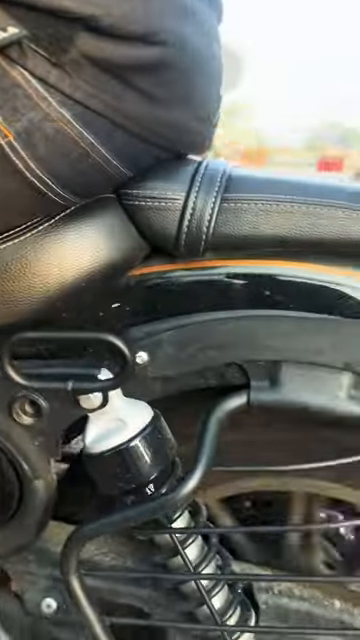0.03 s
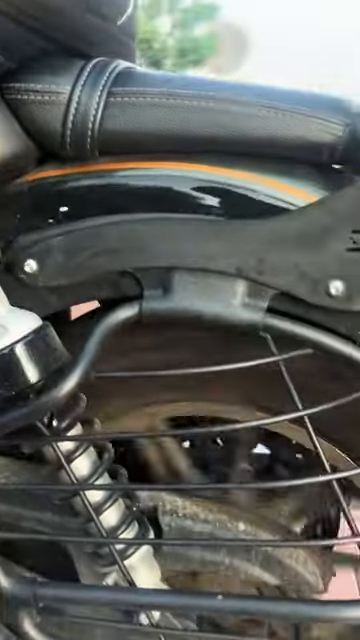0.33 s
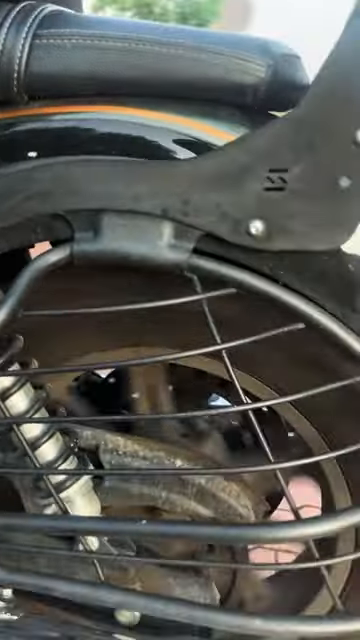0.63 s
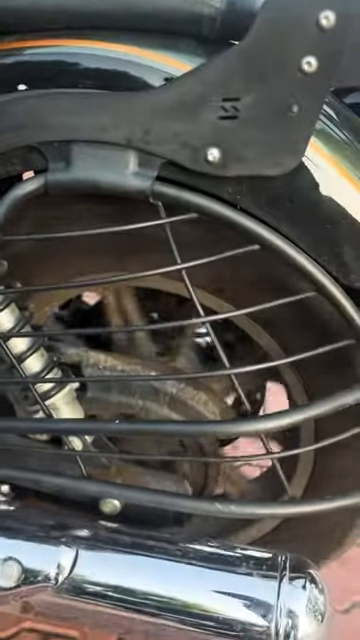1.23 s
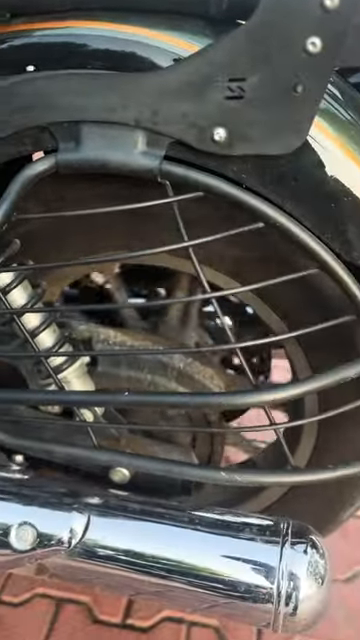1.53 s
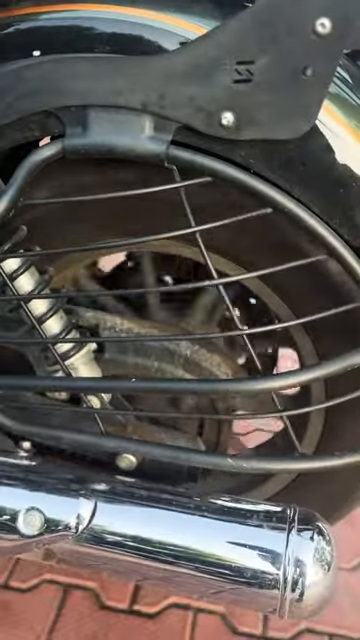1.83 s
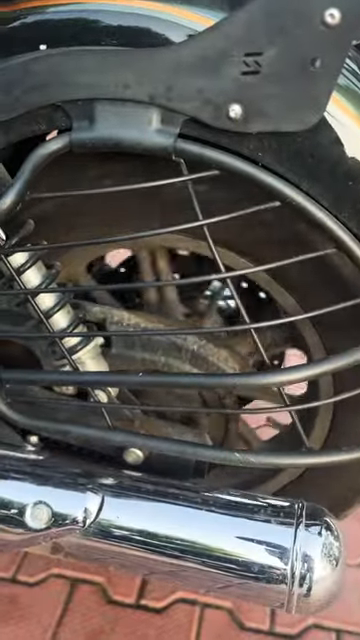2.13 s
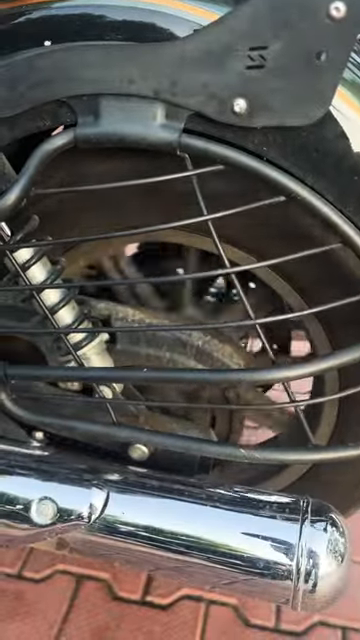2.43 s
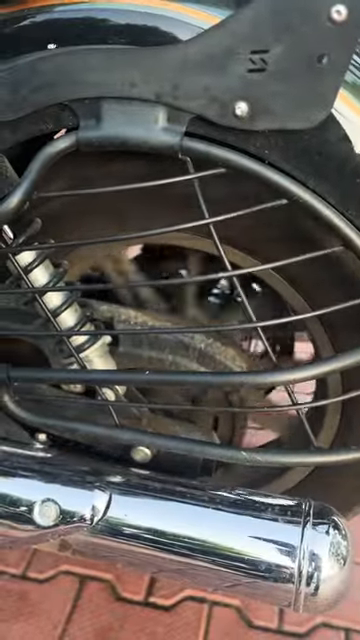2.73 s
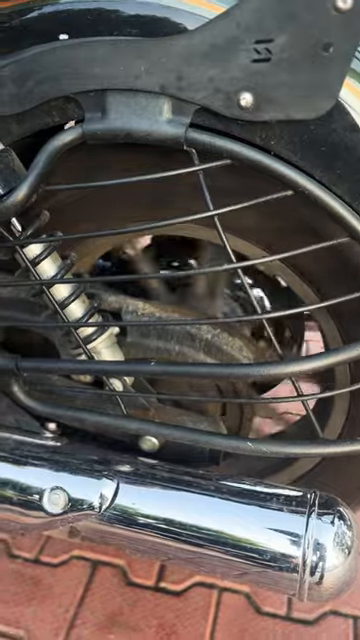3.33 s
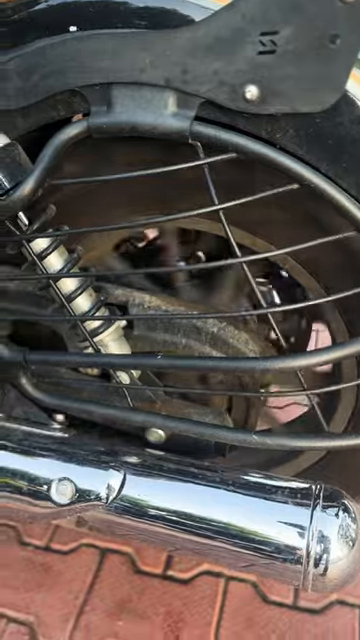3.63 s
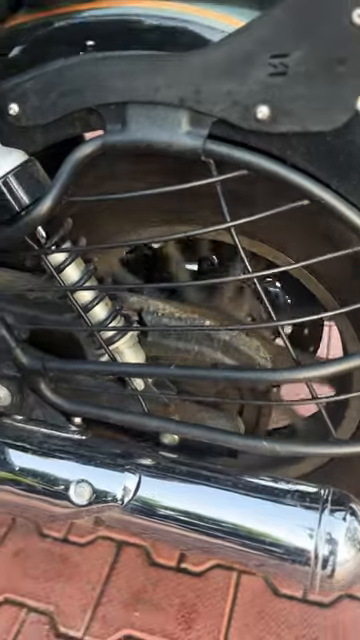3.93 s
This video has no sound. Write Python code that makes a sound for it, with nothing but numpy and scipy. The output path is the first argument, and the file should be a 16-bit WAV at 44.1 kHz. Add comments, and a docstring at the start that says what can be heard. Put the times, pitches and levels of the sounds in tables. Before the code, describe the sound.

Outdoors and very close, a twin-cylinder motorcycle engine rises with a raspy growl, slows to an uneven low thump, then is revved a second time. Faint hiss and metal knocks come as it slows.

```python
"""A parked twin-cylinder motorcycle, close by, revs twice and sinks to a loping idle in between.
Unevenly spaced exhaust pulses ring the silencer: bright under throttle, a hollow boom on the overrun.
Gas rasps and growls in the pipe; single firings pop. Hiss and valve ticks grow with speed.
Drive slack knocks on the case, metal clicks, and the gears whine briefly as the engine slows."""
import sys
import numpy as np
from scipy import signal
from scipy.fft import rfft, irfft
from scipy.io import wavfile

SR = 44100
rng = np.random.default_rng(int(sys.argv[2]) if len(sys.argv) > 2 else 0)


def int16_out(signal):
    """Quantize to a 16-bit WAV file."""
    q = np.round(np.clip(np.atleast_2d(signal).T, -1, 1) * 32767)
    wavfile.write(sys.argv[1], SR, q.astype(np.int16))


N = 176400
TIME_S = np.arange(N) / SR

# engine speed: t/s, four-stroke cycle rate/Hz
ENGINE_SPEED = [(0.0, 23.474), (0.2, 29.617), (0.4, 35.753), (0.55, 37.722), (0.66, 37.291), (0.8, 33.76),
                (1.0, 27.847), (1.25, 21.103), (1.4, 17.556), (1.55, 15.536), (1.7, 11.495), (1.85, 11.047),
                (2.3, 11.168), (2.43, 12.204), (2.58, 17.645), (2.75, 24.056), (3.0, 30.806), (3.15, 34.65),
                (3.28, 36.368), (3.38, 36.376), (3.5, 32.876), (3.75, 26.2), (4.0, 19.776)]
# throttle: t/s, opening/0-1
THROTTLE_OPENING = [(.65, 0.74), (.67, 0), (2.43, 0.17), (2.445, 0.96), (3.36, 0.87), (3.38, 0.12)]
# metal clicks: t/s, f/Hz, level/dB
METAL_CLICKS = [(.743, 12200, -17), (1.41, 7900, -21.5), (3.489, 7950, -18)]
# gear whines: t/s, f/Hz, level/dB
GEAR_WHINES = [(0.781, 2700, -26.5), (.98, 2180, -21.5), (1.141, 1830, -30), (1.32, 1570, -26),
               (1.391, 1470, -33), (3.5, 2570, -19.5), (3.725, 2140, -22), (3.895, 1746, -27.5)]
# cooling fin modes: f/Hz, width/Hz, level/dB
FIN_MODES = [(2174, 31, 6), (2530, 27, 2.5), (2758, 31, 0), (2900, 22, 3.5), (3425, 22, -1),
             (3610, 20, 1.5), (4010, 22, -4), (4270, 30, 1.5), (4810, 19, 0), (5100, 95, 0), (6830, 25, -2)]
# drive knocks: t/s, level/dB
DRIVE_KNOCKS = [(0.788, -7), (.803, 1.5), (1.11, -13), (1.196, -0.5), (1.288, -4), (1.396, -1), (2.578, 4),
                (3.455, 2), (3.626, -2), (3.684, 3), (3.798, -1.5)]
# engine case modes: f/Hz, T60/s, level/dB
CASE_MODES = [(1310, 0.054, -0.5), (1418, 0.037, -0.5), (1454, 0.043, 2), (1510, 0.064, 0.5),
              (1850, 0.016, -9.5), (2040, 0.04, -7), (2584, 0.068, -4.5), (2756, 0.025, -10),
              (4140, 0.022, -15)]
# chain and valve gear hiss, with audio compression gaps at 6200 and 9800 Hz: f/Hz, level/dB
GAPPED_HISS_SPECTRUM = [(150, 5.5), (400, 2), (850, -4.5), (1150, -2), (1450, 3.5), (1750, -2.5),
                        (2300, -5.5), (2700, -5.5), (3300, -7.5), (4050, -4.5), (4600, -9.5), (5200, -8.5),
                        (6200, -24), (8200, -9.5), (9800, -28), (13000, -14.5), (15000, -55)]
# growl partials: multiple of the cycle rate, level/dB
ENGINE_ORDERS = [(10, -14), (11, -1.5), (12, -9), (13, -6), (14, 1.5), (15, -7)]
# pipe and case resonances in the gas rush: f/Hz, width/Hz, level/dB
RASP_MODES = [(295, 18, -25), (421, 55, -6.5), (481, 72, -8.5), (749.7, 12.4, 4.5)]
# sharp firings: t/s, thump/dB, crack/dB
SHARP_FIRINGS = [(1.335, 4.5, -15.5), (1.357, 4.5, -22), (2.445, -6, -15), (2.518, -17, -12),
                 (2.579, -15, -14), (2.632, -14, -15)]
# weak strokes on the overrun: t/s, length/s, level/dB
WEAK_STROKES = [(0.76, 0.019, -22), (1.325, .05, -6.5)]
# throttle, overrun, idle: level/dB, other cylinder's gain, speed exponent, scatter/dB, cut-off/Hz
EXHAUST_STATES = [(3, 0.95, 0.62, .5, 510), (4, 0.59, 0.12, 2.8, 250), (2.5, 0.68, .01, 2.5, 233)]
# silencer modes: f/Hz, width/Hz, signed gains for throttle, overrun, idle
SILENCER_MODES = [(59.7, 30.3, -1.44, -1, 0), (84.8, 21, 2.04, 4, 2.5), (108, 19.7, -0.25, -4.5, -2),
                  (137.7, 44, -1.34, 1.47, 0.25), (184.7, 48.6, 0.32, 0.27, 0.84),
                  (243, 57, 0.66, 0.55, 0.05)]
# lead of the left microphone port: f/Hz, phase/rad
PORT_LEAD = [(60, 0), (250, 0.36), (600, 0.65), (1300, 0.06), (2500, 1.7), (4500, 1.95), (8000, 1.22),
             (13000, 1.35)]
# noise correlation between ports: f/Hz, correlation/0-1
PORT_CORRELATION = [(200, 0.97), (600, 0.79), (1400, 0.73), (2500, 1), (5000, 0.6), (10000, 0.86)]

MID_SPEED_HZ = 24.48
START_CYCLES, SECOND_FIRING_CYCLES = .43, .4
TICK_DECAY_S = .0027


def undb(db):
    """Decibels to gain."""
    return 10 ** (np.asarray(db) / 20)


def unit(x):
    """Scale to rms 1."""
    return x / np.sqrt(np.mean(x ** 2))


def curve(rows):
    """Linear interpolation of (t/s, value) rows."""
    return np.interp(TIME_S, *np.array(rows).T)


def across(rows):
    """(f/Hz, value) rows onto FFT bins, interpolated in log f."""
    hz, value = np.array(rows).T
    return np.interp(np.log(np.arange(N // 2 + 1) * SR / N + 1), np.log(hz), value)


def band(x, hz, width_hz):
    """Resonator, unity peak gain."""
    return signal.lfilter(*signal.iirpeak(hz, hz / width_hz, fs=SR), x)


def low(x, hz, order=2):
    """Butterworth low-pass."""
    return signal.sosfilt(signal.butter(order, hz, fs=SR, output="sos"), x)


def pulses(times_s, sizes):
    """One impulse per time."""
    inside = (times_s >= 0) & (times_s < (N - 1) / SR)
    return np.bincount(np.round(times_s[inside] * SR).astype(int), sizes[inside], N)


def fade(x, decay_s):
    """Exponential tail on each impulse."""
    return signal.lfilter([1], [1, -np.exp(-1 / (decay_s * SR))], x + 1e-18)


def strokes(cycles, offset_cycles, scatter_db, jitter_s=.00006):
    """One impulse per engine cycle, uneven in time and size."""
    chance = rng.standard_normal((128, 2))
    times_s = np.interp(np.arange(len(chance)) + offset_cycles, cycles, TIME_S, left=-1, right=-1)
    return pulses(times_s + jitter_s * chance[:, 0], undb(scatter_db * chance[:, 1]))


def port_noise():
    """Stereo noise, partly correlated between the ports."""
    alike = across(PORT_CORRELATION)
    mid, side = rfft(rng.standard_normal((2, N)))
    return unit(irfft(mid * np.sqrt(1 + alike) + np.array([[1], [-1]]) * side * np.sqrt(1 - alike), N))


def yard(x, tail_db=-21, t60_s=.7):
    """Direct sound plus a faint tail off paving and walls."""
    tail = rng.standard_normal(N) * 1000 ** (-TIME_S / t60_s)
    return x + undb(tail_db) * signal.fftconvolve(x, tail / np.linalg.norm(tail))[:N]


def clicks():
    """Small metal clicks, and a snap as the engine takes the throttle."""
    def burst(at_s, decay_s):
        return fade(pulses(np.array([at_s]), np.ones(1)), decay_s) * port_noise()

    snap = undb(-30) * burst(at_s=2.444, decay_s=.014)
    return snap + sum(undb(db) * band(burst(at_s, .0049), hz, hz / 4) for at_s, hz, db in METAL_CLICKS)


def gear_whine(sigma_s=.018, fall_per_s=.66):
    """Gears sing in short, rough, falling tones."""
    wobble_rad = .64 * unit(low(rng.standard_normal(N), 77))
    out = 0
    for at_s, hz, db in GEAR_WHINES:
        t = TIME_S - at_s
        phase_rad = 2 * np.pi * hz * (t - fall_per_s * t ** 2 / 2) + wobble_rad
        out += undb(db) * np.exp(-(t / sigma_s) ** 2 / 2) * np.sin(phase_rad)
    return out


def valve_ticks(cycles, scatter_db):
    """Envelope of four valve impacts per cycle."""
    return fade(sum(strokes(cycles, k / 4, scatter_db) for k in range(4)), TICK_DECAY_S)


def fins(cycles, speed_oct, db_per_oct=6.5):
    """Valve ticks ring the cooling fins, differently at each port."""
    ticks = valve_ticks(cycles, scatter_db=3) * rng.standard_normal((2, N))
    ring = unit(sum(undb(db) * band(ticks, hz, width_hz) for hz, width_hz, db in FIN_MODES))
    return ring * undb(-38 + db_per_oct * speed_oct)


def knocks(speed_hz, cycles):
    """Drive slack strikes the case: light chatter each cycle, some harder blows."""
    times_s, blow_db = np.array(DRIVE_KNOCKS).T
    blows = pulses(times_s, undb(blow_db - 18.5))
    chatter = sum(strokes(cycles, at, scatter_db=2) for at in (0, SECOND_FIRING_CYCLES))
    chatter *= undb(-27.5) * (speed_hz / MID_SPEED_HZ) ** 1.21
    contact = low(fade(blows + chatter, decay_s=.003) * port_noise(), 3700)
    return 9 * sum(undb(db) * band(contact, hz, np.log(1000) / np.pi / t60_s)
                   for hz, t60_s, db in CASE_MODES)


def engine_hiss(cycles, speed_oct, load, surge, db_per_oct=5.5, treble_db_per_oct=3):
    """Pulsing hiss of chain and valve gear, with two narrow treble gaps from audio compression."""
    ticks = undb(-10.5) * unit(valve_ticks(cycles, scatter_db=3.5))
    drive = surge * port_noise() + ticks * port_noise()
    hiss = unit(irfft(rfft(drive) * undb(across(GAPPED_HISS_SPECTRUM)), N))
    body = low(hiss, 3200, order=1)
    treble = (hiss - body) * undb(treble_db_per_oct * speed_oct)
    floor, running = undb(-41.5), undb(-27.5 + db_per_oct * speed_oct + 2 * load)
    return np.hypot(floor, running) * (body + treble)


def growl(speed_hz, cycles, load, pipe_hz=411, width_hz=90):
    """Under throttle, engine orders climb through a pipe resonance."""
    out = 0
    for order, db in ENGINE_ORDERS:
        detuning = 2 * (order * speed_hz - pipe_hz) / width_hz
        out += undb(db) * np.sin(2 * np.pi * order * cycles) / (1 + detuning ** 2)
    flutter_db = unit(low(rng.standard_normal(N), 15))
    return out * load * undb(-28 + flutter_db)


def rasp(cycles, speed_oct, load, surge, db_per_oct=2.5):
    """Pulse edges and rushing gas excite the higher pipe resonances."""
    edges = strokes(cycles, 0, scatter_db=1.5) + strokes(cycles, SECOND_FIRING_CYCLES, scatter_db=7.5)
    drive = 1.02 * unit(edges) * (load + .28) + surge * port_noise()
    pipe = unit(sum(undb(db) * band(drive, hz, width_hz) for hz, width_hz, db in RASP_MODES))
    return pipe * undb(-38 + 4 * load + db_per_oct * speed_oct)


def pops(thump_hz=183, width_hz=65, crack_hz=466):
    """Single sharp firings: silencer thump plus gas crack."""
    times_s, thump_db, crack_db = np.array(SHARP_FIRINGS).T
    ring = band(pulses(times_s, undb(thump_db)), thump_hz, width_hz)
    thump = band(ring, thump_hz, 2 * width_hz)
    gas = fade(pulses(times_s, undb(crack_db)), decay_s=.008) * port_noise()
    crack = low(band(gas, crack_hz, width_hz=crack_hz), 1200)
    return thump * SR / 1000 + 2 * crack


def exhaust(speed_hz, cycles, load, idle_from_s=1.396, idle_to_s=2.5, swap_s=3.0, muffle_hz=390):
    """Both cylinders ring the silencer; blend of throttle, overrun and idle states."""
    idle = (TIME_S > idle_from_s) * (TIME_S < idle_to_s) * (1 - load)
    shares = [load, 1 - load - idle, idle]
    out = 0
    for state, (db, other_gain, exponent, scatter_db, cutoff_hz) in enumerate(EXHAUST_STATES):
        first = strokes(cycles, 0, scatter_db)
        second = strokes(cycles, SECOND_FIRING_CYCLES, scatter_db)
        puffs = first + other_gain * second
        if state == 1:  # second cylinder dominates the last overrun
            puffs = np.where(TIME_S > swap_s, second + other_gain * first, puffs)
        puffs *= shares[state] * undb(db) * (speed_hz / MID_SPEED_HZ) ** exponent
        if state == 0:  # throttle at low revs: silencer booms
            lugging = np.interp(speed_hz, (24.4, 35), (1, 0))
            out -= undb(11) * band(puffs * lugging, hz=112, width_hz=12)
        for start_s, length_s, dip_db in WEAK_STROKES:
            puffs *= undb(dip_db * ((TIME_S > start_s) & (TIME_S < start_s + length_s)))
        puffs = low(low(puffs, cutoff_hz, order=4)[::-1], cutoff_hz, order=4)[::-1]  # zero phase
        out += sum(gains[state] * band(puffs, hz, width_hz) for hz, width_hz, *gains in SILENCER_MODES)
    return low(out, muffle_hz, order=1) * SR / 1000


def firing_surge(cycles, depth=.51, decay_cycles=.054):
    """Noise envelope that jumps at each firing."""
    tails = sum(np.exp(-((cycles - at) % 1) / decay_cycles) for at in (0, SECOND_FIRING_CYCLES))
    return unit(1 + depth * tails)


def scene():
    """Engine layers driven by speed and throttle, plus timed pops, knocks, whines and clicks."""
    speed_hz, load = curve(ENGINE_SPEED), curve(THROTTLE_OPENING)
    cycles = START_CYCLES + np.cumsum(speed_hz) / SR
    speed_oct = np.log2(speed_hz / MID_SPEED_HZ)
    surge = firing_surge(cycles)
    silencer = yard(exhaust(speed_hz, cycles, load)) + pops()
    pipe = rasp(cycles, speed_oct, load, surge) + growl(speed_hz, cycles, load)
    engine = engine_hiss(cycles, speed_oct, load, surge) + fins(cycles, speed_oct)
    near = undb(curve([(0, 3.5), (1.37, 0)]))  # phone starts nearer the engine
    return silencer + near * (pipe + engine) + knocks(speed_hz, cycles) + gear_whine() + clicks()


def record(dry, ceiling=.95, top_hz=13900):
    """Phone: left port leads, peaks are rounded, top is cut."""
    phase_rad = across(PORT_LEAD) * np.array([[1], [-1]]) / 2
    ports = irfft(rfft(dry) * np.exp(1j * phase_rad), N)
    limited = ports / (1 + (ports / ceiling) ** 8) ** (1 / 8)
    return signal.sosfilt(signal.ellip(8, .2, 70, top_hz, fs=SR, output="sos"), limited)


dry = scene()
out = record(dry)
int16_out(out)
```